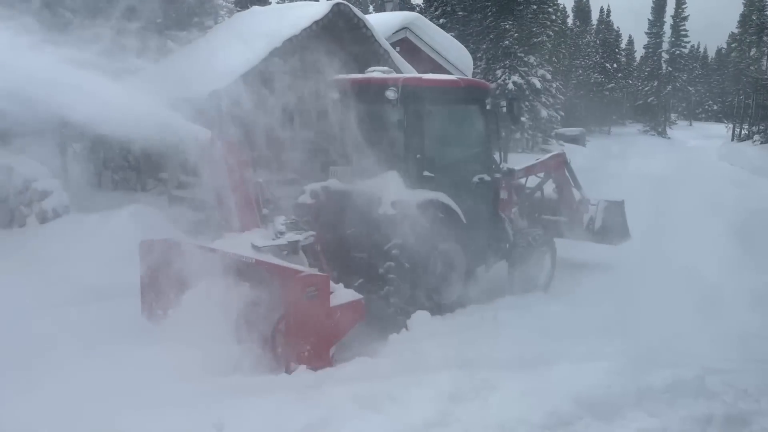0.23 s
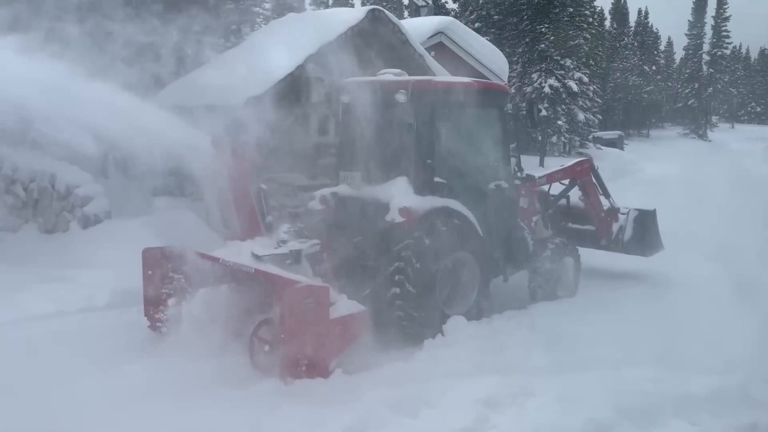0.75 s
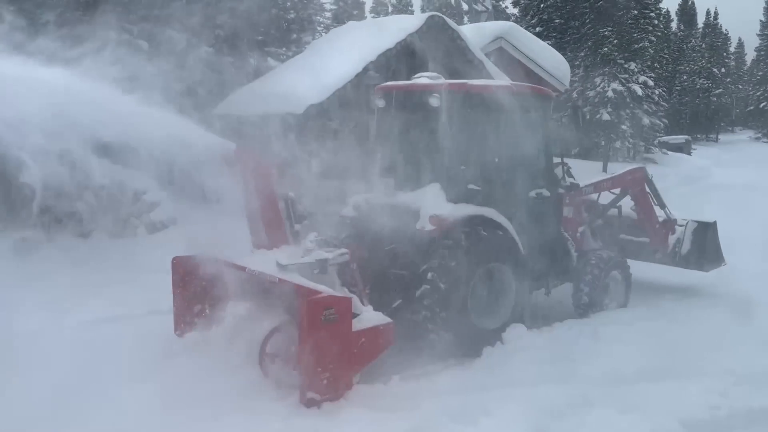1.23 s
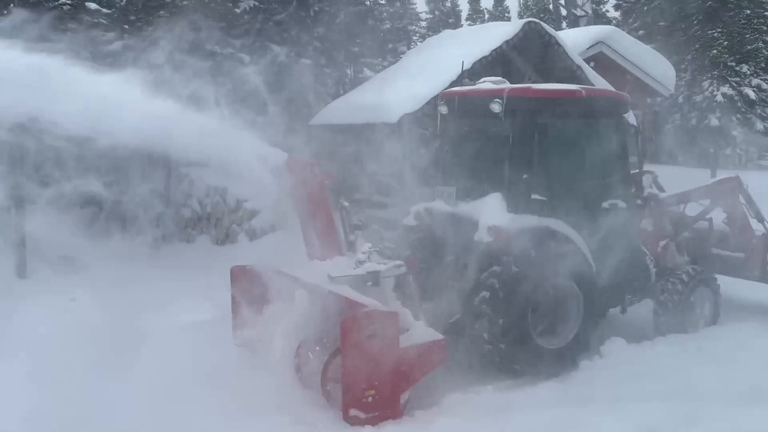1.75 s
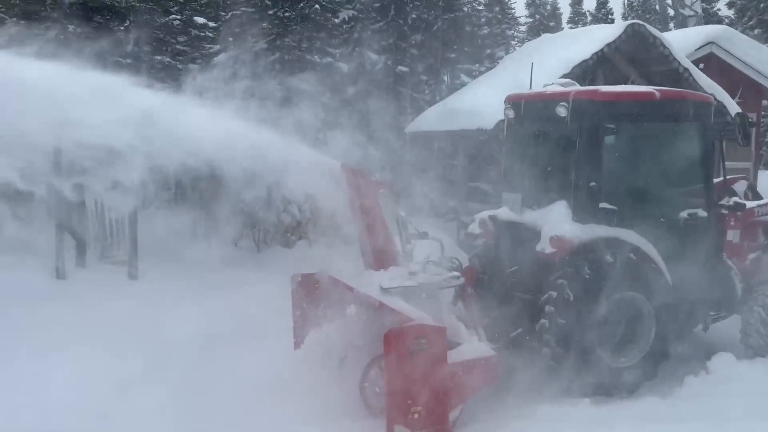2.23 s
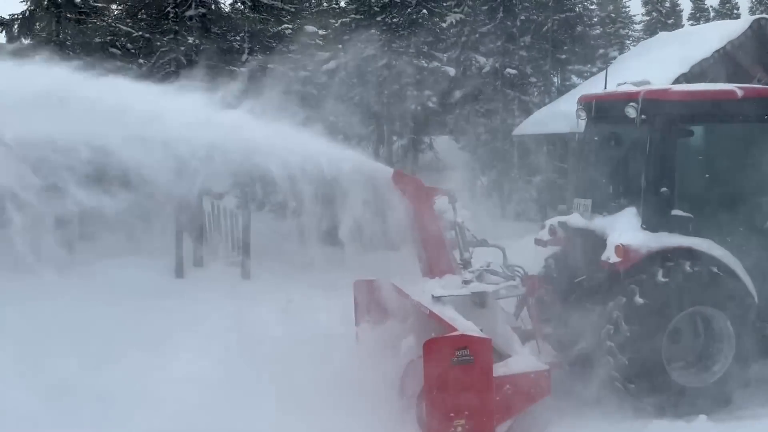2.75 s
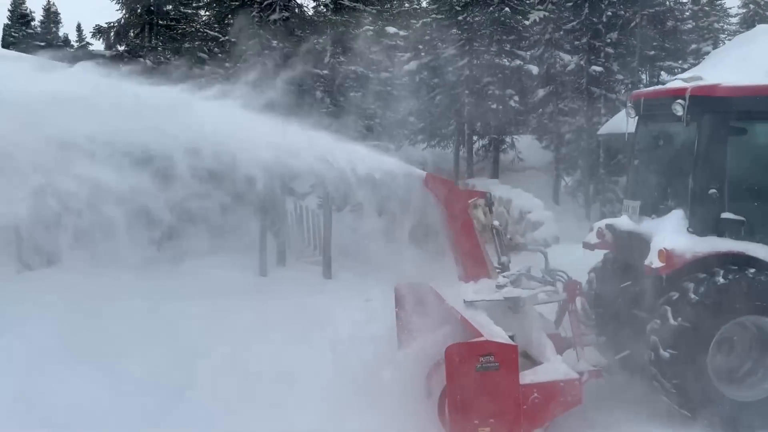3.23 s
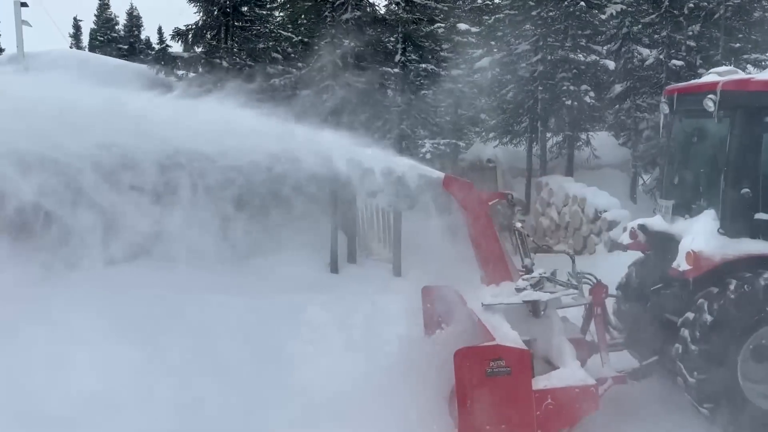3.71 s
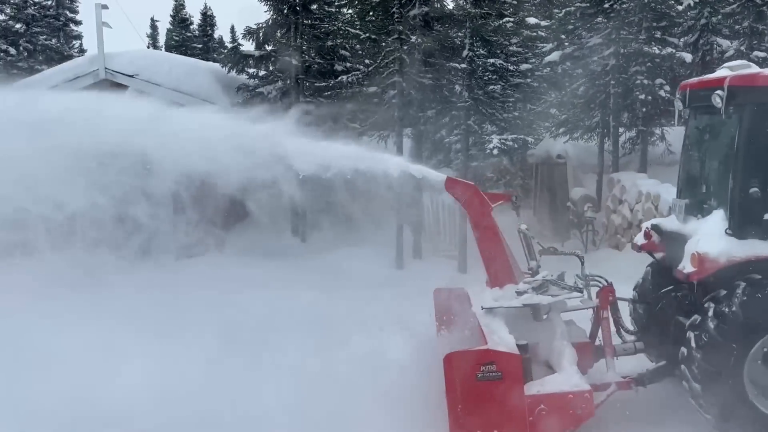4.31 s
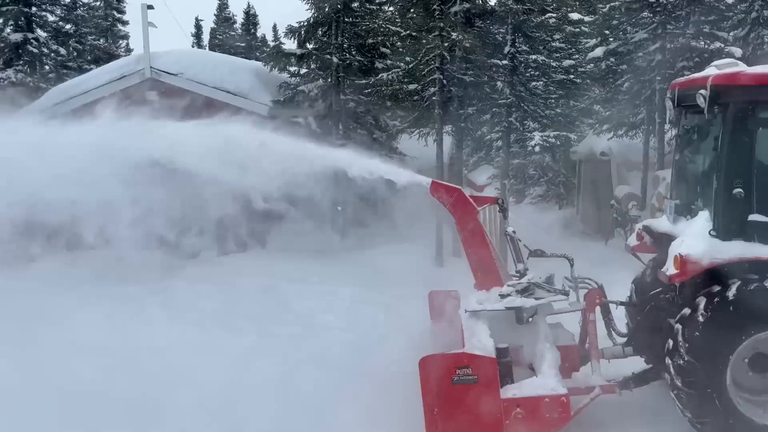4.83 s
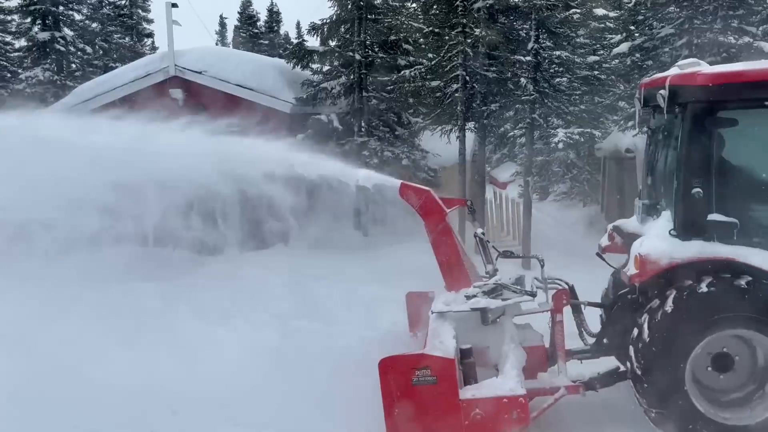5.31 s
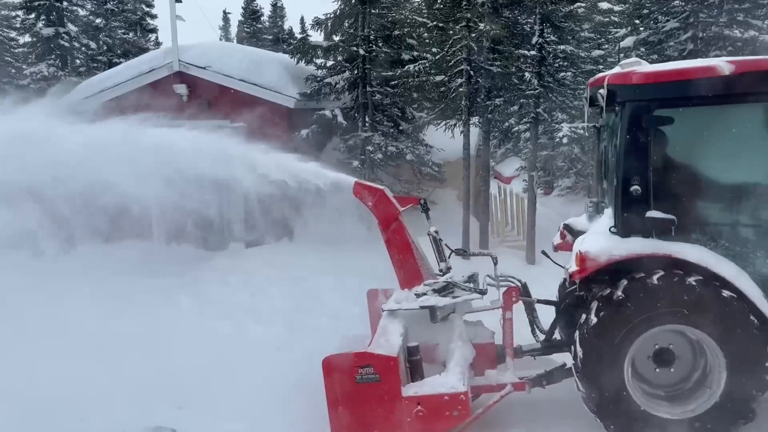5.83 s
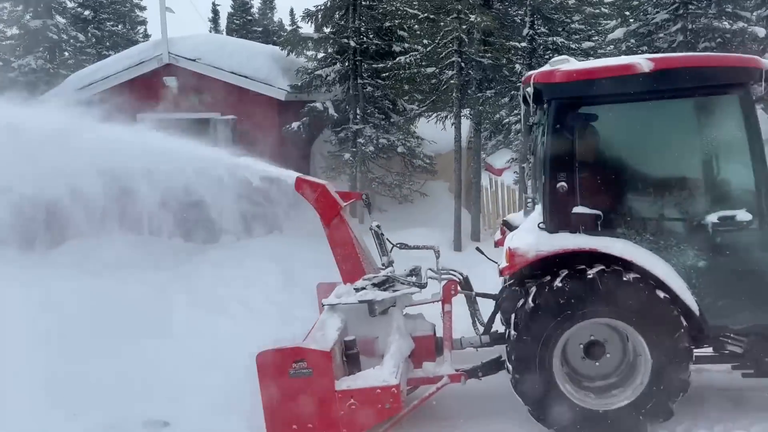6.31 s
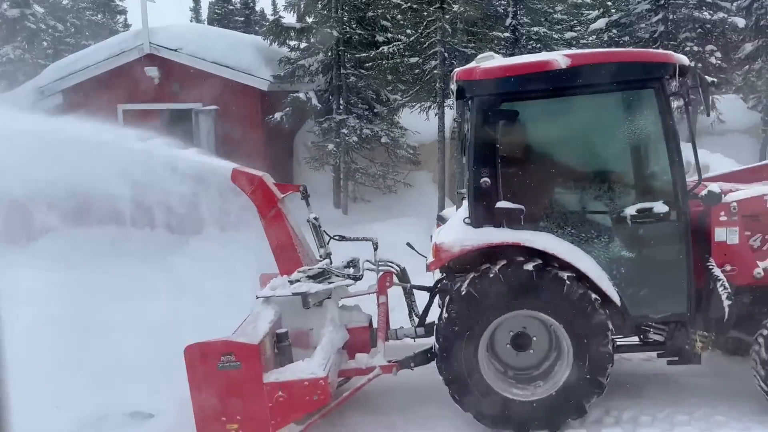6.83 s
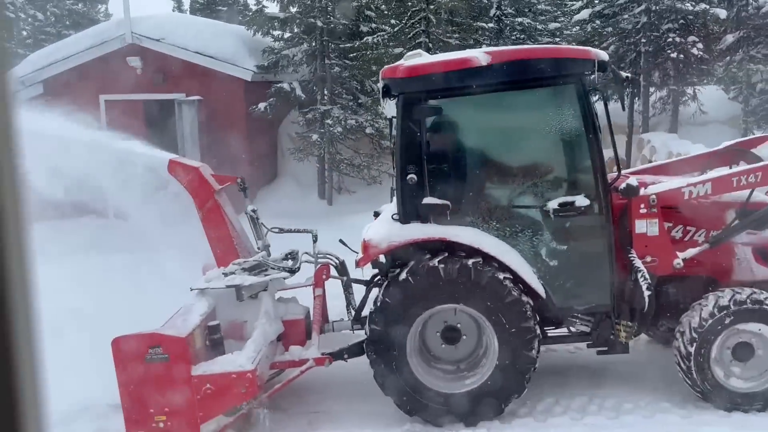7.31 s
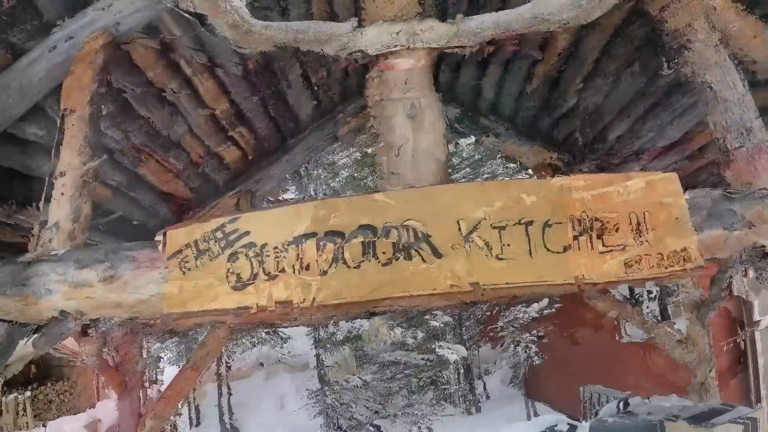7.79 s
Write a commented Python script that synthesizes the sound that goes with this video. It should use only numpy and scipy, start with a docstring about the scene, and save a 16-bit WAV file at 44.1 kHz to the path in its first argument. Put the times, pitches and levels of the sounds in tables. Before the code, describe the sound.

In a snowy yard, a compact tractor works steadily with a snowblower. A deep, wavering low hum sits under fast diesel knocking, with a continuous rushing roar and hiss of snow through the chute. A little icy spray patters near the handheld phone around one second. The machine turns and comes close, growing heavier, then fades out within half a second, leaving a low gust thumping the microphones.

```python
"""Tractor and snowblower passing in deep snow

Across a yard, a compact tractor backs slowly past a phone's two microphones and comes close by.
The blower drones in sines tied to its blades and the diesel knocks in multiples of its crank.
Snow roars through the chute as coloured noise, and a little patters down nearby as grains and pellets.
At the end the machine fades to nothing, and a gust of low noise and puffs buffets the microphones."""
import sys
import numpy as np
from scipy import signal
from scipy.fft import rfft, irfft, next_fast_len
from scipy.io import wavfile
from scipy.ndimage import uniform_filter1d, map_coordinates

SR = 44100
rng = np.random.default_rng(int(sys.argv[2]) if len(sys.argv) > 2 else 0)


def materialize(psi):
    """Save the field psi as 16-bit PCM at rate SR to the path in sys.argv[1].

    A 1-D psi becomes a single channel; in a 2-D psi each row is a channel.
    """
    bounded = np.clip(np.atleast_2d(psi).T, -1, 1)
    quanta = np.round(bounded * 32767).astype(np.int16)
    wavfile.write(sys.argv[1], SR, quanta)


N = 355446


def amp(db):
    """dB to gain."""
    return 10 ** (np.asarray(db) / 20)


def unit(x):
    """x at rms 1."""
    return x / np.sqrt(np.mean(x ** 2) + 1e-20)


def along(points, hz):
    """Read (Hz, value) points at any frequency, straight between points on a log axis."""
    f, v = np.transpose(points)
    return np.interp(np.log(hz + 1), np.log(f + 1), v)


def curves(rows):
    """One value per sample for each column after the time."""
    s, *cols = np.transpose(rows)
    return [np.interp(np.arange(N) / SR, s, c) for c in cols]


def wobble(rate, size=N):
    """A smooth random curve through rate random knots a second."""
    knots = rng.standard_normal(int(size * rate / SR) + 4)
    return map_coordinates(knots, [np.arange(size) * rate / SR])


def filtered(x, response):
    """x times a response of frequency, with room for its tail."""
    m = next_fast_len(N + SR // 4)
    return irfft(rfft(x, m) * response(np.fft.rfftfreq(m, 1 / SR)), m)[..., :N]


def patchy(patchy_db):
    """Two white noises that share patches of random gain in time and frequency."""
    z = signal.stft(rng.standard_normal((2, N + 512)), nperseg=512)[2]
    field = rng.standard_normal(z.shape[1:])
    field = uniform_filter1d(field, size=6, axis=0)
    field = uniform_filter1d(field, size=10, axis=1)
    return signal.istft(z * amp(patchy_db * unit(field)), nperseg=512)[1][:, :N]


# How far the difference of the two microphones follows their sum.
# Each row: frequency in Hz, share from 0 to 1.
SHARE_FOLLOWING = [(60, .7), (340, .45), (500, .42), (650, .2), (900, .6), (1250, .6), (1460, .93),
                   (1750, .74), (2600, .83), (4000, .65), (6000, .77), (11000, .3)]
# Where the following part leans between the microphones.
# Each row: frequency in Hz, lead in radians (0 leans left, pi leans right).
LEAD = [(60, .1), (500, .2), (1050, .2), (1250, 3.4), (1460, 3.5), (1750, 2.35), (2100, 1.85), (4500, 1.45),
        (5500, -1.45), (8000, -1.45), (11000, 1.5)]


def stereo(pair, spectra, side_db):
    """Colour the microphones' sum and difference; the part that follows the sum places the sound."""
    sum_spectrum, difference_spectrum = spectra

    def response(hz):
        share = np.clip(along(SHARE_FOLLOWING, hz), 0, 1)
        wide = amp(along(difference_spectrum, hz) + side_db)
        tied = wide * share * np.exp(1j * along(LEAD, hz))
        loose = wide * np.sqrt(1 - share ** 2)
        return np.array([amp(along(sum_spectrum, hz)), tied, loose])

    mid, tied, loose = filtered(pair[[0, 0, 1]], response)
    return np.array([mid + tied + loose, mid - tied - loose]) / np.std(mid)


# The tractor turning past the phone.
# Each row: time in seconds, view from 0 (seen from behind) to 1 (from the side).
PASSING = [(0, 0.046), (1.4, .1), (2.2, 0.37), (3, 0.94), (5, 0.94), (8.06, 0.94)]


def side_view():
    """How far the tractor has turned side-on, 0 to 1."""
    return np.clip(curves(PASSING)[0], 0, 1)


# The tractor coming nearer.
# Each row: time in seconds, nearness from 0 (across the yard) to 1 (close by).
CLOSING = [(0, 0.047), (5, 0.096), (6, 0.33), (6.8, 0.78), (8.06, 1)]


def heard(behind_db, beside_db, close_db):
    """A level that changes as the tractor turns past and comes close."""
    beside, close = side_view(), np.clip(curves(CLOSING)[0], 0, 1)
    return behind_db + beside * (beside_db - behind_db) + close * (close_db - beside_db)


def fade():
    """Gain of the whole machine: full, then evenly down to nothing."""
    start_s, end_s = 7.466, 7.95
    return np.clip((end_s - np.arange(N) / SR) / (end_s - start_s), 0, 1)


# Pitch of the blower. Each row: time in seconds, blade passes in Hz.
BLADE_PASSES = [(0, 79.6), (1.3, 79.2), (2.1, 79.4), (2.85, 79.35), (4.85, 80.5), (5.25, 80.05),
                (5.8, 80.0), (6.45, 79.55), (6.85, 79.15), (7.6, 78.6), (8.06, 78.8)]


def blade_phase():
    """Phase in radians of the blade passes; the four-bladed fan shaft turns at a quarter of it."""
    return 2 * np.pi * np.cumsum(curves(BLADE_PASSES)[0]) / SR


def crank_phase():
    """Phase in radians of the engine's crank, geared to the blower."""
    blade_passes_per_turn = 2.21
    return blade_phase() / blade_passes_per_turn


# Lowest colour heard at the phone, for the low wind and the machine's thud.
# Two spectra, the microphones' sum and difference. Each row: frequency in Hz, density in dB per Hz.
LOW_COLOUR = [(15, -37.5), (25, -11), (40, -2.5), (52, 4), (65, 3.5), (90, -27), (150, -120)], [(15, -35),
              (50, 1), (90, -22.5), (150, -120)]


def low_wind():
    """Deep patchy noise that comes up as the machine fades."""
    return amp(-38.5) * (1 - fade()) ** 4 * stereo(patchy(patchy_db=1.0), LOW_COLOUR, side_db=-30.0)


# Strength of the gust at the microphones. Each row: time in seconds, level in dB.
GUST = [(7.8, -110), (7.87, -54), (7.92, -45), (7.95, -45), (7.972, -49), (7.99, -42), (8.02, -37),
        (8.06, -33)]
# Colour of its buffeting. Each row: frequency in Hz, density in dB per Hz.
BUFFET = [(20, -26), (50, 1), (120, 8), (250, 3), (400, -14), (700, -34), (1200, -47), (2000, -51),
          (3000, -66), (6000, -120)]


def gust():
    """Lumpy low noise of wind on the microphones, nearly alike on both."""
    push = amp(curves(GUST)[0] + 2.8 * wobble(60)) * rng.standard_normal((2, N))
    return np.std(push[0]) * stereo(push, (BUFFET, BUFFET), side_db=-33.0)


# Eddies on the microphone ports. Each row: centre in seconds, peak in dB, half width in seconds.
PUFFS = [(7.9643, -46, .0006), (7.9861, -38, .0008), (7.9918, -40, .0009), (7.9963, -35, .0007),
         (8.0029, -41, .0008), (8.0145, -33, .0006), (8.0267, -37, .0007), (8.0304, -36, .0007),
         (8.0359, -36, .0009), (8.0461, -35, .00075), (8.0522, -40, .0008)]


def puffs():
    """Single soft pressure pulses of either sign, each with a dip on both sides, alike on both microphones."""
    out = 0
    for s, db, half_s in PUFFS:
        u = (np.arange(N) / SR - s) / half_s
        out = out + amp(db) * rng.choice([-1, 1]) * (1 - u ** 2) * np.exp(-u ** 2 / 2)
    return out


# Fine snow landing near the phone. Each row: time in seconds, level in dB before the ice colour.
SPRAY = [(.87, -110), (.885, -88), (.915, -86.5), (.96, -74.5), (.982, -77), (.996, -72), (1.01, -74.5),
         (1.05, -77.5), (1.09, -73.5), (1.125, -73), (1.145, -70.5), (1.168, -69.5), (1.18, -75.5),
         (1.2, -80.5), (1.24, -88), (1.26, -110)]
# Single pellets landing near the phone.
# Each row: start in seconds, starting level in dB before the ice colour, 60 dB decay in seconds.
PELLETS = [(.929, -70.5, .012), (0.942, -66, .012), (0.9568, -61.5, 0.023), (1.089, -66.5, .01),
           (1.098, -65, .01), (1.169, -65.5, .04), (2.579, -78.5, 0.027), (6.215, -76, 0.18),
           (6.31, -80, .15), (6.461, -79.5, .15), (7.025, -71, 0.026), (7.215, -73, .1)]
# Colour of ice grains at the phone.
# Two spectra, the microphones' sum and difference. Each row: frequency in Hz, density in dB per Hz.
ICE = ([(2500, -120), (3800, -11), (4700, 0.5), (6000, -5), (7000, -7), (7700, -13.5), (8400, -22.5),
       (9400, -15.5), (11000, -9), (13000, -11.5), (14400, -18)], [(2500, -120), (4000, -11), (6000, -10),
       (8000, -4.5), (9400, -4.5), (11000, -18.5), (14400, -17.5)])


def snowfall():
    """Dense tiny grains that swell unevenly and stop, and a few decaying pellets, in the colour of ice."""
    grain_db = 2.5 * rng.standard_normal(N) + 1.5 * wobble(120)
    grains = unit(rng.standard_normal((2, N)) * amp(grain_db))
    falling = amp(curves(SPRAY)[0]) * grains
    t = np.arange(SR // 5) / SR
    for s, db, t60 in PELLETS:
        tail = falling[:, round(s * SR):][:, :len(t)]
        tail += amp(db - 60 * t / t60) * rng.standard_normal((2, len(t)))
    return np.std(falling[0]) * stereo(falling, ICE, side_db=-1.0)


# One pellet on sheet metal.
# The row: start in seconds, pitch in Hz, level in dB before the attack, 60 dB decay in seconds.
PING = (7.0235, 4520, -58, .045)


def ping():
    """A pellet rings sheet metal: one sine with a soft attack and an exponential decay."""
    s, hz, db, t60 = PING
    t = np.clip(np.arange(N) / SR - s, 0, None)
    attack = 1 - np.exp(-t / .002)
    return amp(db - 60 * t / t60) * np.sin(2 * np.pi * hz * t) * attack


# Thin whistle of the engine, as heard side-on. Each row: pitch in Hz, average rms level in dB.
WHISTLE = [(9518, -96), (9679, -98.5)]


def whistle():
    """Two thin high tones of the engine that come out as the tractor turns side-on."""
    t = np.arange(N) / SR
    tones = 0
    for hz, db in WHISTLE:
        tones = tones + amp(db + 1.5 * wobble(4)) * np.sin(2 * np.pi * hz * t + .5 * wobble(4.6))
    come_out = np.interp(t, (1.6, 2), [.3, 1])
    return np.sqrt(2) * come_out * tones


# Panels and gears that ring toward the phone for a while as the tractor turns past.
# Each row: start in seconds, stop in seconds, pitch in Hz, width in Hz, relative level in dB.
RINGING = [(-.2, 3.1, 648, 18, -65), (.1, 4.2, 1715, 24, -68), (.75, 2, 1717, 12, -67),
           (.3, 1.4, 1152, 19, -69), (2.8, 5.6, 1443, 18, -65), (.1, 1.7, 1507, 18, -70),
           (.5, 1.3, 1605, 22, -68), (1.8, 2.6, 1420, 40, -68), (2.3, 4.4, 1758, 30, -73),
           (2.4, 6.4, 905, 25, -64), (5.4, 7.7, 950, 50, -66), (1.8, 2.9, 3300, 200, -78.5),
           (5.18, 5.5, 3362, 12, -82), (5.57, 5.66, 3365, 12, -84), (5.49, 5.64, 3120, 12, -84),
           (3.7, 6.5, 3780, 330, -79), (1.4, 2.5, 4200, 260, -80), (6.3, 7.7, 4450, 200, -81.5),
           (5.9, 7.8, 2265, 19, -73), (.1, 2.1, 267, 10, -56), (1.8, 5, 436, 14, -59.5),
           (0, 2.1, 282, 6, -53), (7.08, 7.55, 283, 8, -49), (3.6, 7.6, 245.5, 7, -58),
           (4.9, 6.7, 313, 8, -60), (-.2, 3.6, 113, 5, -59), (7.05, 7.35, 3330, 12, -88),
           (-.2, 1.4, 1900, 40, -68), (-.2, 2, 2350, 40, -73), (2, 3.7, 1205, 19, -72),
           (5.8, 7.6, 1200, 19, -73), (2, 3.8, 2600, 70, -76), (5.8, 7.7, 2600, 50, -75),
           (3.8, 5.8, 1690, 30, -69), (4, 7.7, 1920, 25, -72), (5.8, 7.7, 1090, 30, -69),
           (6, 7.7, 1400, 35, -67), (4, 7.8, 2360, 30, -75), (5.7, 7.6, 1760, 30, -71),
           (-.2, 1.9, 435, 14, -60), (1.8, 2.4, 6250, 500, -91), (-.2, 1.6, 4150, 200, -82),
           (-.2, 1, 4700, 250, -80), (6.1, 6.35, 6300, 600, -87), (6.6, 7.3, 6100, 250, -91),
           (5.5, 6.3, 5550, 200, -91)]


def ringing():
    """Narrow noise at each resonance, swelling, fading and wandering a little in pitch."""
    waver_hz = 5  # wander of pitches above 1500 Hz; lower ones wander less in proportion
    out = np.zeros((2, N))
    for start, stop, hz, width_hz, db in RINGING:
        span = slice(max(round(start * SR), 0), round(stop * SR))
        t = np.arange(N)[span] / SR
        swell = np.abs(np.sin(np.pi * (t - start) / (stop - start))) ** 0.45
        pitch = hz + waver_hz * min(hz / 1500, 1) * wobble(3, size=len(t))
        turn = 2 * np.pi * np.cumsum(pitch) / SR
        tone = wobble(width_hz, size=len(t)) * np.sin(turn) + wobble(width_hz, size=len(t)) * np.cos(turn)
        # the narrowest ones are gear whines with a steady core
        if width_hz < 20:
            tone += (3 if hz > 3000 else 1.2) * np.sin(turn)
        # where wide exceeds 1 the microphones hear it in opposite phase
        wide = np.interp(hz, [200, 800, 1600, 2200], [.15, 1.1, 1.6, 0.27])
        out[:, span] += amp(db) * swell * tone * [[1 + wide], [1 - wide]]
    return out


def thud():
    """The machine's deepest patchy noise, strongest close by."""
    return amp(heard(-48.5, -49, -41)) * stereo(patchy(patchy_db=2.5), LOW_COLOUR, side_db=-20.5)


# Colour of the machine's rumble at the phone.
# Two spectra, the microphones' sum and difference. Each row: frequency in Hz, density in dB per Hz.
RUMBLE = ([(40, -62.5), (70, -8.5), (100, 0), (135, -5.5), (175, 4), (200, -7.5), (216, -6), (232, -11),
          (252, -1), (265, -6), (282, 0), (300, -10.5), (320, -8), (340, -14), (360, -14), (380, -16),
          (412, -25.5), (440, -24.5), (520, -35), (800, -120)], [(40, -59.5), (70, -5.5), (100, 0),
          (170, -7), (300, -11.5), (420, -7.5), (520, -19.5), (800, -120)])


def rumble():
    """Low noise under the engine, with gentle patches of gain."""
    return amp(heard(-41.5, -40.5, -42)) * stereo(patchy(patchy_db=1.1), RUMBLE, side_db=-6.5)


def knock():
    """One cylinder knocks harder: a gain that jumps once a crank turn and dies away, unevenly."""
    life_turns = 0.48
    jump = np.exp(-(crank_phase() / (2 * np.pi) % 1) / life_turns)
    jump = uniform_filter1d(jump, size=90)
    uneven = 0.5 + 0.27 * wobble(30)  # about half the depth in dB
    return amp(heard(9, 5, 2.5) * (jump - jump.mean()) * uneven)


# Colours of the roar and the hiss, from behind the tractor and from beside it.
# Two spectra each, the microphones' sum and difference. Each row: frequency in Hz, density in dB per Hz.
ROAR_BEHIND = [(260, -27), (450, -0.5), (533, -8), (596, -7), (651, -1.5), (694, -8.5), (883, -10),
               (1110, -10), (1330, -13.5), (1510, -8.5), (1720, -9), (2200, -17.5), (2420, -15.5),
               (2800, -27.5), (3060, -34.5), (3980, -64.5), (6730, -120)], [(260, -38), (450, 7),
               (568, -15), (605, -21), (746, 1.5), (1010, -7.5), (1110, 3.5), (1320, -13.5), (1440, 5),
               (1540, 1.5), (1800, -17), (2180, -24.5), (3060, -31.5), (3980, -66.5), (6730, -120)]
ROAR_BESIDE = [(260, -27.5), (450, -1), (468, -13.5), (563, -9), (610, -9), (630, -8), (828, -11.5),
               (904, -5.5), (1260, -17.5), (1460, -5.5), (1610, -16), (1750, -12), (2100, -21.5),
               (2330, -15), (3060, -29), (3980, -51.5), (6730, -120)], [(260, -27), (450, -3.5), (468, -7),
               (568, -8.5), (651, -14), (776, -4), (996, -7.5), (1130, -7), (1280, -18), (1390, -0.5),
               (1460, -1.5), (2020, -29), (3060, -36), (3980, -57), (6730, -120)]
HISS_BEHIND = ([(2000, -120), (2900, -1), (3300, 0.5), (3800, -5.5), (4200, 1), (4700, -3.5), (5200, -5),
               (6000, -13.5), (7000, -20.5), (7700, -28.5), (8400, -40.5), (9000, -35.5), (9500, -22),
               (13000, -24.5), (14400, -38.5)], [(2000, -120), (3000, -9.5), (3600, -9), (4200, -10.5),
               (4700, -21), (6000, -16.5), (7000, -25), (9400, -22.5), (11000, -33.5), (13000, -41.5)])
HISS_BESIDE = ([(2000, -120), (2900, -3), (3300, 1), (3800, -1.5), (4200, -5.5), (4700, -6), (5200, -10.5),
               (6000, -15.5), (7000, -19.5), (7700, -35), (8400, -41), (9000, -33), (9500, -20.5),
               (13000, -33.5), (14400, -40)], [(2000, -120), (3000, -5), (3800, -12.5), (4700, -12.5),
               (5200, -23), (6000, -18.5), (7000, -22), (9400, -24.5), (11000, -37), (13000, -47)])
# Swell of the roar about its level for the place. Each row: time in seconds, change in dB.
ROARING = [(0, 0.5), (1.2, 0.5), (1.8, -2.5), (2.6, -1.5), (3.8, 1), (4.5, 0), (6.4, 1.5), (7.5, 4)]


def chute():
    """Snow in the chute: a roar pulsing with the knock and a hiss, both shaken by the same lumps of snow."""
    beside = side_view()
    firing = knock()
    lumps = wobble(35)

    def blend(behind, side):
        return np.sqrt(1 - beside) * behind + np.sqrt(beside) * side

    roar = blend(stereo(patchy(patchy_db=1.5) * firing, ROAR_BEHIND, side_db=-3.0),
                 stereo(patchy(patchy_db=0.86) * firing, ROAR_BESIDE, side_db=0.8))
    hiss = blend(stereo(patchy(patchy_db=2.0), HISS_BEHIND, side_db=2.5),
                 stereo(patchy(patchy_db=1.3), HISS_BESIDE, side_db=0.3))
    roar_db = heard(-51.5, -52, -54.5) + curves(ROARING)[0] + 0.65 * lumps
    hiss_db = heard(-73.5, -73, -70.5) + 1.2 * lumps + 0.94 * wobble(4.5)
    return amp(roar_db) * roar + amp(hiss_db) * hiss


# Engine orders at the phone, as typical amplitudes between the two microphones.
# Each row: multiple of the crank, level in dB from behind, in dB from the side, in dB close by.
ENGINE_ORDERS = [(2, -42.5, -55, -48.5), (4, -57.5, -56.5, -53), (5, -56, -53.5, -55), (6, -49, -43.5, -52),
                 (7, -42.5, -51, -60.5), (8, -61, -54.5, -59), (9, -53, -55.5, -60),
                 (10, -51.5, -62.5, -68), (11, -53, -61.5, -69), (12, -60.5, -57.5, -56.5),
                 (13, -66.5, -63.5, -70), (14, -63, -62, -73), (15, -68.5, -68.5, -68), (16, -70, -64, -70)]


def engine():
    """The diesel's harmonics of the crank, each unsteady in level and phase."""
    turn = crank_phase()
    left_right = np.array([[1], [-1]])
    out = 0
    for k, *levels_db in ENGINE_ORDERS:
        # higher orders reach the two microphones further apart in phase
        apart = 0.042 * k * left_right
        waver_db = 0.99 * wobble(4) + heard(2, .8, .8) * wobble(11)
        level = amp(heard(*levels_db) + waver_db + 0.92 * left_right)
        out = out + level * np.sin(k * turn + .18 * wobble(6) + apart)
    return out


# The blower's note at the phone. Each row: time in seconds, rms level in dB.
DRONE = [(0.05, -38.5), (0.45, -50), (0.65, -36), (0.85, -32), (1.05, -30), (1.45, -36.5), (1.65, -31.5),
         (2.05, -26), (2.45, -27), (2.85, -28), (3.65, -24), (4.85, -27.5), (5.3, -26), (6.45, -26.5),
         (6.9, -23), (7.25, -23), (7.55, -26.5), (7.82, -22), (7.92, -28.5), (8.06, -24)]
# Its octave. Each row: time in seconds, rms level in dB.
OCTAVE = [(0, -41), (.95, -41.5), (1.2, -53), (1.45, -42.5), (2.1, -60), (2.45, -45.5), (2.75, -45),
          (3.5, -40.5), (4.4, -38.5), (5, -35), (6.5, -36), (7.5, -38.5), (8.06, -36)]
# Ninth multiple of the fan shaft, swelling in the housing. Each row: time in seconds, rms level in dB.
BOOM = [(0.0, -66), (0.12, -44.5), (0.77, -57), (0.83, -41.5), (1.25, -52.5), (1.38, -36.5), (2.19, -52),
        (4.05, -46), (4.16, -64.5), (4.32, -35.5), (5.08, -52), (5.47, -38), (5.78, -54), (5.91, -38),
        (6.45, -57), (6.52, -42), (7.23, -34.5), (7.5, -43.5)]
# One of the four blades throws harder, which sounds further multiples of the fan shaft.
# Each row: multiple of the shaft, rms level in dB from behind, in dB from the side, in dB close by.
UNEVEN_BLADE = [(5, -60.5, -61.5, -58.5), (6, -49, -47.5, -48.5), (7, -64, -58.5, -55),
                (10, -67.5, -62, -58), (14, -52, -54, -55.5)]


def drone():
    """The blower's note at the blade passes, its octave and the weaker multiples of the fan shaft."""
    turn = blade_phase()
    shaft = turn / 4
    note = amp(curves(DRONE)[0] + heard(1.9, 0.094, .18) * wobble(13)) * np.sin(turn)
    octave = amp(curves(OCTAVE)[0] + .6 * wobble(6)) * np.sin(2 * turn + 1.2 + .08 * wobble(8))
    boom = amp(curves(BOOM)[0] + wobble(9)) * np.sin(9 * shaft + .3 * wobble(6))
    uneven = 0
    for k, *levels_db in UNEVEN_BLADE:
        uneven = uneven + amp(heard(*levels_db) + 2 * wobble(5)) * np.sin(k * shaft + .2 * wobble(5))
    # all lean slightly to the left microphone
    note_pair = note * amp([[.55], [-.55]])
    rest_pair = (octave + boom + uneven) * amp([[.4], [-.4]])
    return np.sqrt(2) * (note_pair + rest_pair)


def scene():
    """Wind and falling snow at the phone, with the machine fading out at the end."""
    nearby = low_wind() + gust() + puffs() + snowfall() + ping()
    machine = whistle() + ringing() + thud() + rumble() + chute() + engine() + drone()
    return nearby + fade() * machine


def record(dry):
    """The phone keeps nothing above its band limit of 14.5 kHz."""
    return filtered(dry, lambda hz: hz < 14500)


dry = scene()
out = record(dry)
materialize(out)
```